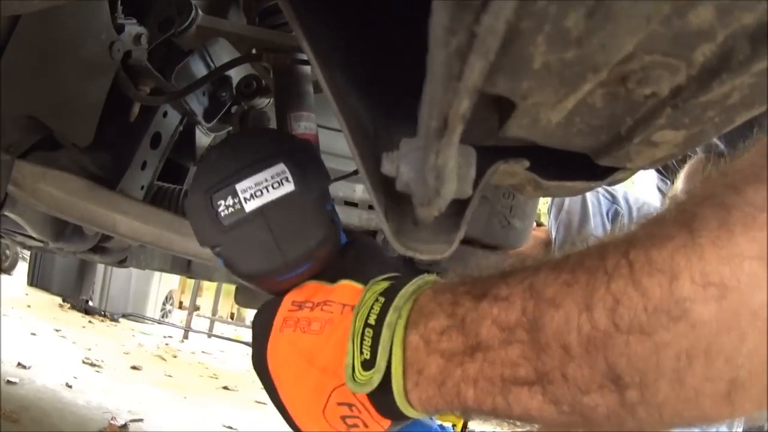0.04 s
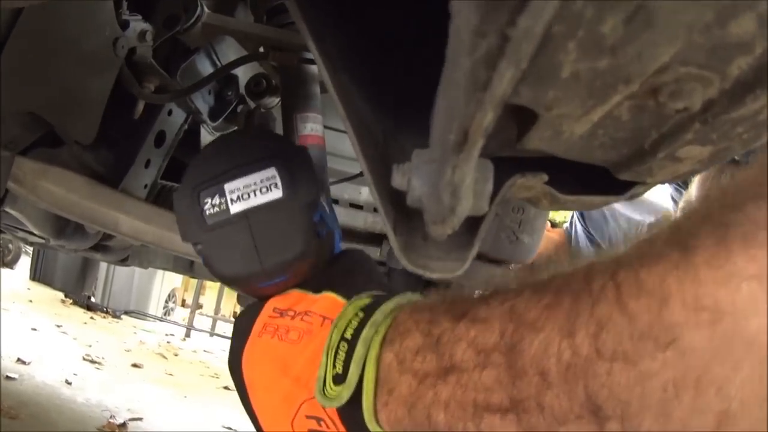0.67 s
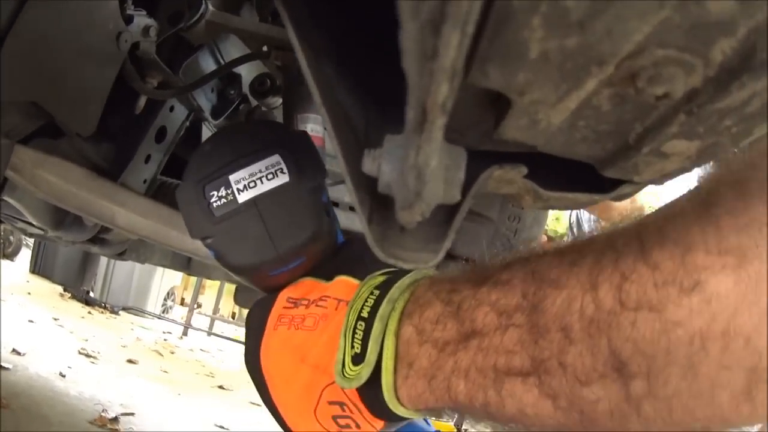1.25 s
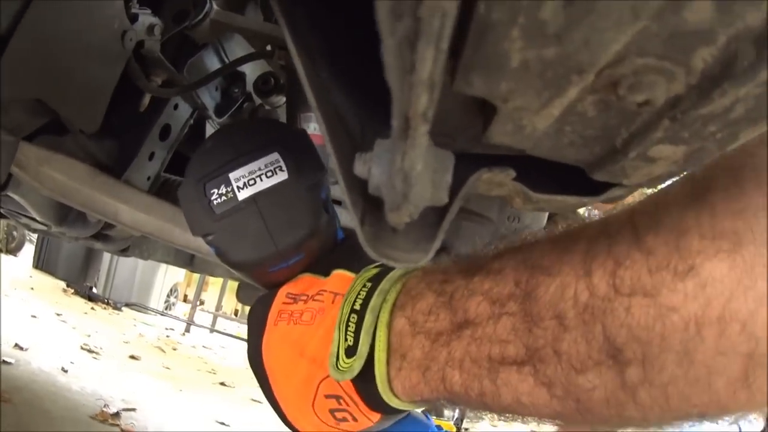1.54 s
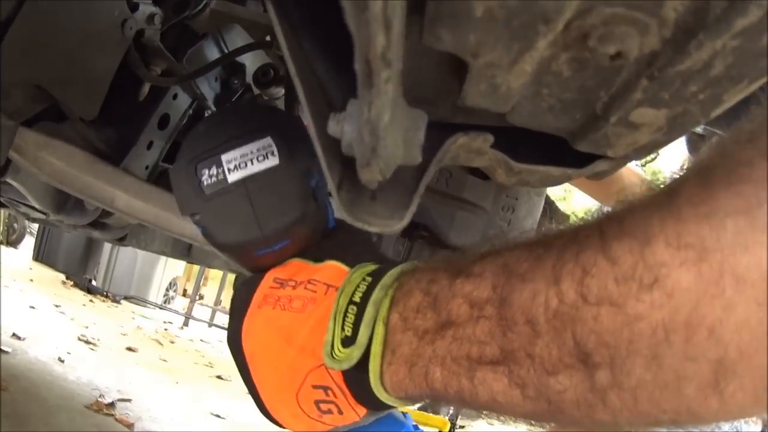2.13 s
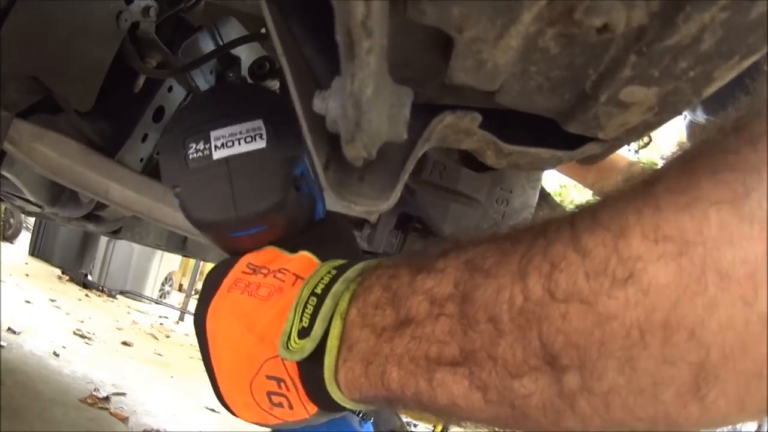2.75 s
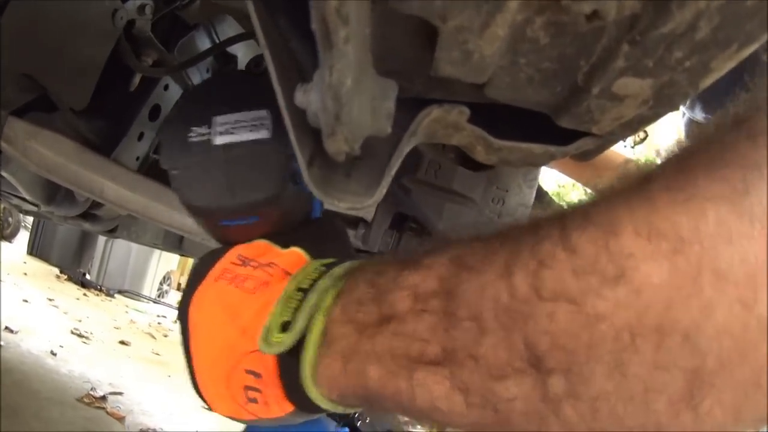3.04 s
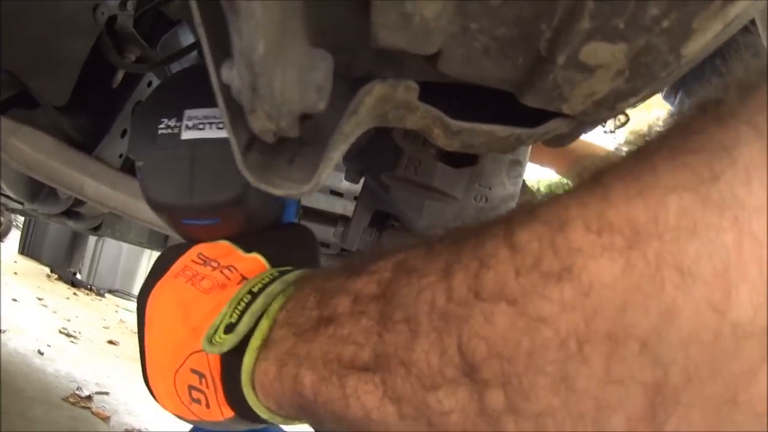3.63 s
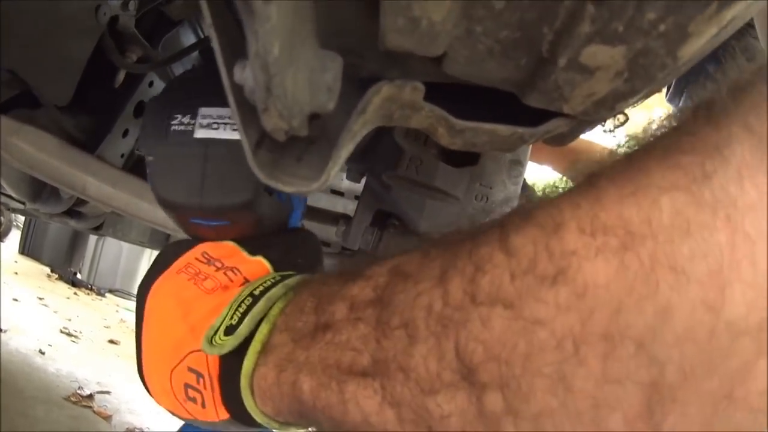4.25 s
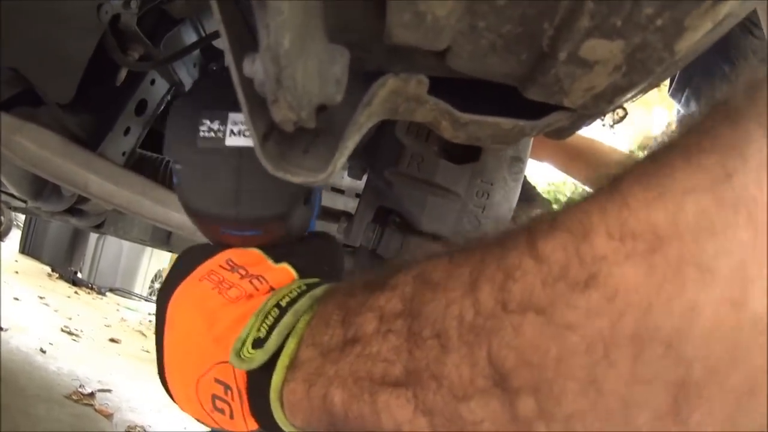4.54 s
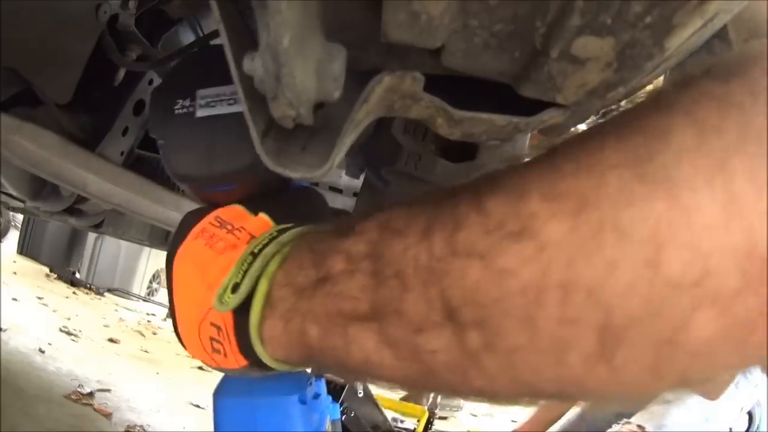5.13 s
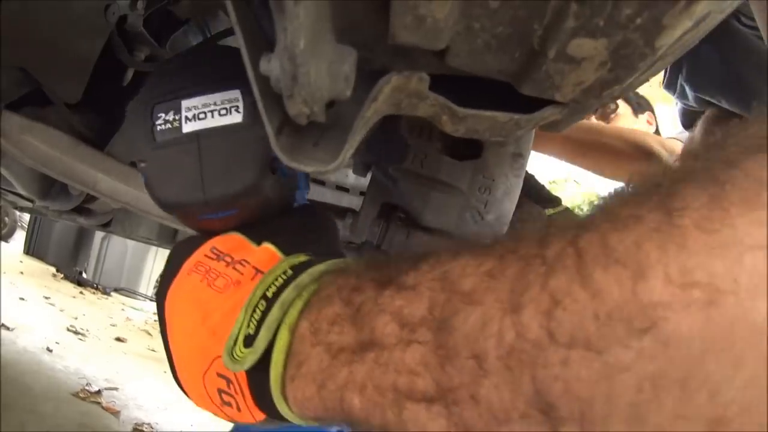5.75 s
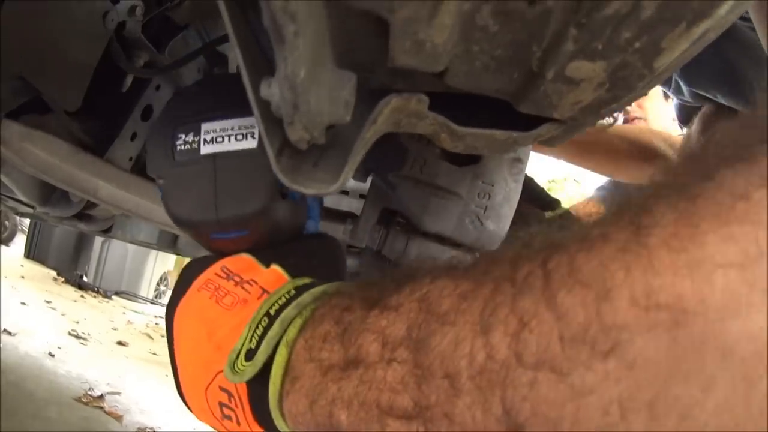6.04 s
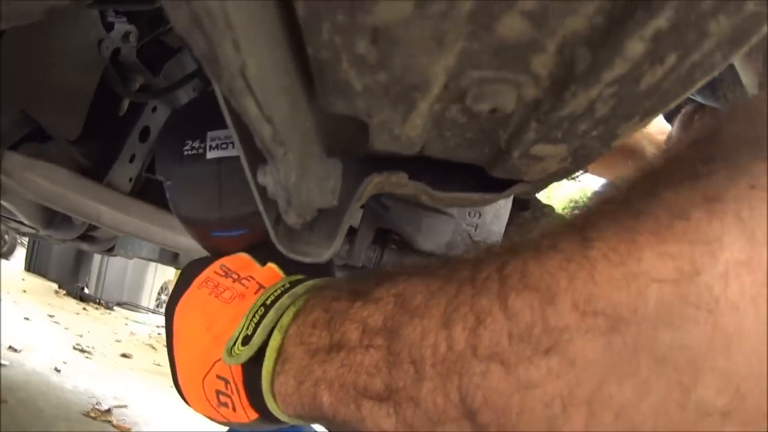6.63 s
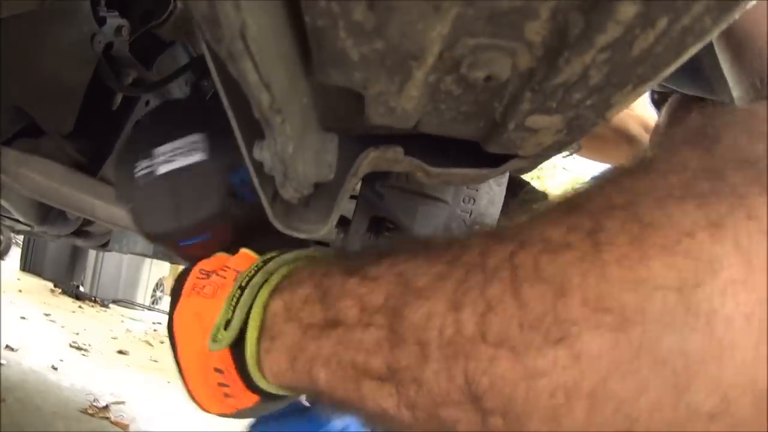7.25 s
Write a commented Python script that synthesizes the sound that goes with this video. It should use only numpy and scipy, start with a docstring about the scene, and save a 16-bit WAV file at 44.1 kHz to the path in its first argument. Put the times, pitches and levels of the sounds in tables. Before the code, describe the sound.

Close by, an impact wrench rattles hard on steel twice, then spins free and coasts down with a brief squeal and socket clinks.

```python
"""A cordless impact wrench works on a suspension bolt under a car. A glove rustles, stray blows land,
then the hammer runs at about forty blows a second, each cracking in the socket and ringing the arm.
It stalls, the socket rattles, and a second, longer burst follows. The bolt gives: the loose socket
clinks, the tool spins free, then coasts down with a falling gear whine, ticking teeth and one short
squeal. Last, the socket clinks again as the tool is shifted."""
import sys
import numpy as np
from scipy import signal
from scipy.fft import rfft, irfft
from scipy.io import wavfile
from scipy.ndimage import map_coordinates

SR = 44100
rng = np.random.default_rng(int(sys.argv[2]) if len(sys.argv) > 2 else 0)


def master_out(mix):
    """Clip the mix to full scale and print it as 16-bit PCM to the path in sys.argv[1]."""
    frames = np.transpose(np.atleast_2d(mix))
    ceiling = np.clip(frames, -1, 1)
    pcm = np.round(ceiling * 32767).astype(np.int16)
    wavfile.write(sys.argv[1], SR, pcm)


N = 329952
TIME = np.arange(N) / SR


def from_db(db):
    """Decibels to gain."""
    return 10 ** (np.asarray(db) / 20)


def unit_rms(x):
    """Scale to unit rms."""
    return x / np.sqrt(np.mean(x ** 2) + 1e-20)


def over_time(rows, outside=None):
    """Each column of a timed table, read at every sample."""
    times, *columns = np.transpose(rows)
    return [np.interp(TIME, times, column, outside, outside) for column in columns]


def at_hz(points, hz):
    """Read a table on a log-frequency axis."""
    knots_hz, values = np.transpose(points)
    return np.interp(np.log(np.maximum(hz, 1)), np.log(knots_hz), values)


def drift(per_s):
    """Smooth random wander of unit rms."""
    knots = rng.standard_normal(8192)
    return unit_rms(map_coordinates(knots, [TIME * per_s], order=3, mode="wrap"))


def coloured(spectrum):
    """Noise of unit rms with the given spectrum."""
    gain = from_db(at_hz(spectrum, np.fft.rfftfreq(N, 1 / SR)))
    return unit_rms(irfft(rfft(rng.standard_normal(N)) * gain, N))


def clicks(times, sizes):
    """One sample for each contact."""
    return np.bincount(np.clip(np.round(times * SR).astype(int), 0, N - 1), sizes, N)


def decay(energy, t60_s):
    """Stored energy leaks away by 60 dB in t60_s."""
    return signal.lfilter([1], [1, -from_db(-120 / (t60_s * SR))], energy + 1e-20)


# Handling spectra. Each row: frequency in Hz, density in dB.
RUMBLE = [(25, -53), (60, -8), (95, -16), (135, 1.5), (180, -1), (230, 5), (400, -2), (700, 0), (1200, -5),
          (2200, -17.5), (4400, -49)]
RUSTLE = [(410, -20.5), (700, -10), (788, -14), (1280, -17), (2840, -17), (6070, -29), (7010, -27),
          (10800, -45.5), (16000, -44)]
# Noise floor. Each row: time in seconds, rumble in dB, rustle in dB.
FLOOR = [(0, -59, -43.5), (1.6, -57.5, -63), (4.5, -43, -61), (5.6, -53.5, -63), (7.48, -48, -47.5)]
# Moves. Each row: middle in seconds, half length in seconds, rumble in dB, rustle in dB.
SHIFTS = [(.07, 0.086, -44, -34.5), (1.097, 0.16, -42.5, -48.5), (5.03, 0.17, -38, -55),
          (5.235, 0.081, -65, -58), (6.163, 0.12, -44, -53), (6.41, 0.11, -42.5, -67),
          (6.602, 0.077, -51, -39.5), (7.357, 0.08, -41.5, -48)]


def handling():
    """Glove and tool shift against the car, each move swelling and fading over the noise floor."""
    power = from_db(over_time(FLOOR)) ** 2
    for middle_s, half_s, *levels_db in SHIFTS:
        power += np.outer(from_db(levels_db) ** 2, np.exp(-2 * ((TIME - middle_s) / half_s) ** 2))
    rumble = np.sqrt(power[0]) * from_db(0.49 * drift(25)) * coloured(RUMBLE)
    rustle = np.sqrt(power[1]) * from_db(1.6 * drift(70)) * coloured(RUSTLE)
    return rumble + rustle


# Background tones. Each row: frequency in Hz, relative level in dB.
HUM = [(119, -64.5), (221, -56.5), (2891, -70.5), (3639, -68)]


def garage_hum():
    """Faint tones from around the garage waver in level and phase."""
    return sum(from_db(db + 1.5 + 0.52 * drift(11)) * np.sin(2 * np.pi * hz * TIME + drift(16))
               for hz, db in HUM)


# Decay of the dense steel modes. Each row: frequency in Hz, unscaled t60 in seconds.
RING_T60 = [(100, 0.28), (800, 0.28), (2000, 0.24), (5000, 0.12), (14000, 0.026)]
# First snap of a contact. Each row: frequency in Hz, relative level in dB.
SNAP = [(1000, -12.5), (2500, 1), (6000, -1.5), (11000, -30)]
BAND_EDGES_HZ = np.geomspace(25, 17000, 25)


def dense_ring(times, band_db, ring_scale, snap_db, snap_t60_s):
    """Countless steel modes, struck anew by each contact: a snap, then a ring dying band by band."""
    out, white = np.zeros(N), rng.standard_normal((2, N))
    for k, hz in enumerate(np.sqrt(BAND_EDGES_HZ[1:] * BAND_EDGES_HZ[:-1])):
        band = signal.butter(2, BAND_EDGES_HZ[k:k + 2], "band", fs=SR, output="sos")
        scatter_db = 1.2 * rng.standard_normal(len(times))  # no two contacts hit the same spot
        energy = clicks(times, from_db(band_db(hz) + scatter_db) ** 2)
        ring = decay(energy, ring_scale * at_hz(RING_T60, hz))
        snap = from_db(snap_db + at_hz(SNAP, hz)) ** 2 * decay(energy, snap_t60_s)
        out += signal.sosfilt(band, white[k % 2] * np.sqrt(ring + snap))
    return out


# Modes of arm and bolt. Each row: frequency in Hz, relative level in dB, t60 in seconds.
ARM_MODES = [(219.7, -8.5, 0.079), (322.2, -5.5, 0.13), (372.4, -5, 0.053), (433, -9.5, 0.25),
             (567.2, -3, 0.14), (676.6, -4.5, 0.13), (785, -4, 0.2), (839, 0, 0.057), (920, 0.5, 0.18),
             (1000, 2, 0.12), (1222, 0.5, 0.11), (1364, 3, 0.055), (1417, 1, 0.11), (1653, 2.5, 0.041),
             (1780, 8, 0.055), (2523, 4.5, 0.075), (2754, 6, 0.062), (3000, -1, 0.028), (3180, -9.5, 0.062),
             (3310, 5.5, 0.047), (3534, -1.5, 0.073), (3653, 3.5, 0.03), (4370, -12, 0.045)]


def arm_ring(times, level_db, scatter_db):
    """Each contact strikes every mode of the suspension arm with a strength of its own."""
    out = np.zeros(N)
    for k, (hz, db, t60_s) in enumerate(ARM_MODES):
        radius, angle = from_db(-60 / (t60_s * SR)), 2 * np.pi * hz / SR
        feedback = [1, -2 * radius * np.cos(angle), radius * radius]
        push = clicks(times, from_db(level_db + db + scatter_db * rng.standard_normal(len(times))))
        out += (-1) ** k * signal.lfilter([.5, 0, -.5], feedback, push + 1e-18 * rng.random(N))
    return out


def knocks(rows, spectrum, level_db, arm_db, bounce_s, bounce_db, **ring):
    """Contacts that bounce once. Each row: start in seconds, then level, extra bass and treble in dB."""
    bounces = rows + [0, bounce_db, 0, 0]
    bounces[:, 0] += bounce_s * rng.uniform(.8, 1.2, len(rows))
    times, db, bass_db, treble_db = np.vstack([rows, bounces]).T

    def band_db(hz):
        low = at_hz([(700, 1), (1500, 0)], hz)
        high = at_hz([(4000, 0), (6000, 1)], hz)
        return level_db + at_hz(spectrum, hz) + db + low * bass_db + high * treble_db
    return dense_ring(times, band_db, **ring) + arm_ring(times, db + bass_db + arm_db, scatter_db=6)


# Steel struck by the hammer. Each row: frequency in Hz, density in dB.
CRACK = [(100, -73), (300, -14), (600, -7), (930, -1), (1100, -5.5), (1750, 1), (2150, -1), (2700, -1.5),
         (3600, 1.5), (5500, -5), (7900, 0), (9800, -17), (12000, -12.5), (13600, -6.5), (16000, -19.5)]
# Blows out of step. Each row: start in seconds, level in dB, extra treble in dB.
STRAY_BLOWS = [(0.0323, -11, -4.5), (0.0735, -5, -25), (0.0862, -20, 7), (0.0997, -7, 1), (0.1164, -10, -6),
               (0.132, -13, -4), (0.145, -5.5, -3.5), (0.9213, -7.5, -0.5), (0.946, -10.5, -5),
               (0.9594, -8, 0), (0.9873, -9, -16.5), (.997, -16.5, -2), (1.0198, -20, -1),
               (1.0287, -12, 3.5), (1.744, -10.5, -0.5), (1.7873, -7, -12), (1.818, -8.5, 0.5),
               (1.8304, -8.5, -2), (1.8456, -8, -10), (1.8626, -5.5, -3), (1.8885, -13.5, -4)]


def stray_blows(bass_db):
    """Starting or stalling, the hammer lands heavily; a glancing blow is duller and has less weight."""
    times, db, treble_db = np.transpose(STRAY_BLOWS)
    rows = np.column_stack([times, db, bass_db + 0.18 * treble_db, treble_db])
    return knocks(rows, CRACK, level_db=-3.5, arm_db=-29, bounce_s=0.0067, bounce_db=-7.5,
                  ring_scale=1, snap_db=12, snap_t60_s=0.0045)


def blow_times(burst, limp_s=.0003, jitter_s=.0001, settle_blows=2, sag_s_per_blow=1.25e-5):
    """The hammer finds its pace, then slows as the battery sags; its two lugs land early and late."""
    start_s, end_s, period_s, run_up_s = burst
    blow = np.arange((end_s - start_s) / period_s)
    lag_s = run_up_s * (1 - np.exp(-blow / settle_blows))
    times = start_s + period_s * blow + lag_s + sag_s_per_blow * blow ** 2 / 2
    uneven = times + limp_s * (blow % 2 - .5) + jitter_s * rng.standard_normal(len(blow))
    return uneven[times < end_s]


def socket_ring(times, level_db, t60_s, snap_db, snap_t60_s):
    """The part of the ring that is the same for every blow gives the hammering its hard buzz."""
    t = TIME[:SR // 8]
    attack = 1 - np.exp(-t / 0.000068)  # the crack spreads through socket and bolt
    fade = from_db(-60 * t / t60_s) + from_db(snap_db - 60 * t / snap_t60_s)
    response = coloured(CRACK)[:len(t)] * attack * fade
    return signal.fftconvolve(clicks(times, from_db(level_db)), response)[:N]


# Hammer rebounding along its cam. Each row: frequency in Hz, density in dB.
REBOUND = [(40, -29), (110, -42), (220, -7), (450, -6), (750, 1), (1100, -7.5), (1700, -1), (3000, 3),
           (6000, -4.5), (15000, -40.5)]
# Steady hammering. Each row: start, end, base blow period, time lost in run-up, all in seconds.
BURSTS = [(.1795, .9, .02464, .0181), (1.8981, 4.45, .02442, .0153)]
CRACK_DB, CRACK_FADE_DB_PER_S, CRACK_SCATTER_DB = -20, 0.13, 1.7
THUD_DB, THUD_FADE_DB_PER_S, UNSETTLED_DB, UNSETTLED_S = -22, 0.96, 5, 0.065


def hammering():
    """Lugs crack on the anvil; between blows the hammer rebounds and its reaction shakes the arm."""
    bursts = [blow_times(burst) for burst in BURSTS]
    times = np.concatenate(bursts)
    age_s = np.concatenate([blows - blows[0] for blows in bursts])
    crack_db = CRACK_DB - CRACK_FADE_DB_PER_S * age_s + CRACK_SCATTER_DB * rng.standard_normal(len(times))
    thud_db = THUD_DB - THUD_FADE_DB_PER_S * age_s + UNSETTLED_DB * np.exp(-age_s / UNSETTLED_S)
    out = dense_ring(times, lambda hz: crack_db + at_hz(CRACK, hz) + 7.5,
                     ring_scale=0.76, snap_db=12, snap_t60_s=0.011)
    out += socket_ring(times, crack_db - .3, t60_s=0.094, snap_db=-3.5, snap_t60_s=0.013)
    for delay_s, gain_db in [(.0062, 0.29), (.0155, 0)]:
        rebounds = times + delay_s + 0.00041 * rng.standard_normal(len(times))
        out += dense_ring(rebounds, lambda hz: thud_db + gain_db + at_hz(REBOUND, hz),
                          ring_scale=1, snap_db=-9, snap_t60_s=0.027)
    return out + arm_ring(times + .005, thud_db - 10, scatter_db=4.5)


# Clink spectrum. Each row: frequency in Hz, density in dB.
CLINK_SPECTRUM = [(40, -25), (110, -19), (230, -0.5), (800, 2), (1300, -1.5), (1900, -0.5), (2700, -2),
                  (4000, -1.5), (5200, -20.5), (8000, 5), (9600, -54), (12000, -18), (15500, -36)]
# Clinks on the bolt, bassier bumps on the arm. Each row: start in seconds, level in dB, extra bass in dB.
CLINKS = [(1.192, -30, -16), (1.2087, -25, -22), (1.242, -29.5, -13), (1.727, -24, -15),
          (4.5355, -10.5, 4.5), (4.58, -18.5, 10), (4.597, -10, 0), (4.7334, -8, 1.5), (4.742, -8.5, -6),
          (4.792, -4.5, -3.5), (4.844, -17, 9), (4.8545, -7.5, -3), (4.8666, -13.5, 6), (5.018, -5.5, -6.5),
          (5.1268, -18, -1), (6.071, -32, 18), (6.337, -24, 7), (6.394, -44, 17), (6.5965, -23, 11.5),
          (6.6091, -16.5, 0.5), (6.631, -14, -4), (6.651, -16, -26), (6.687, -24, -4), (7.0097, -21.5, -29),
          (7.1872, -39.5, 12.5), (7.2616, -18.5, -2.5), (7.2737, -26, -4), (7.3576, -26, -10),
          (7.3984, -8.5, -10)]
FULL_CLINK_DB, TREBLE_DB_PER_DB = -11.5, 0.51
# Light rattling. Each row: start in seconds, end in seconds, level in dB.
RATTLES = [(1.108, 1.29, -37), (1.327, 1.457, -47), (7.267, 7.352, -35.5)]
RATTLE_PER_S, RATTLE_SCATTER_DB, RATTLE_BASS_DB, RATTLE_TREBLE_DB = 36, 4.5, -13, 3.5


def loose_socket():
    """The socket clinks, brighter the harder it hits, and rattles as the tool is eased or moved."""
    rows = [(start_s, db, bass_db, TREBLE_DB_PER_DB * (db - FULL_CLINK_DB))
            for start_s, db, bass_db in CLINKS]
    for start_s, end_s, db in RATTLES:
        for slot_s in np.arange(start_s, end_s, 1 / RATTLE_PER_S):
            hit_s = slot_s + rng.random() / RATTLE_PER_S
            hit_db = db + RATTLE_SCATTER_DB * rng.standard_normal()
            rows.append((hit_s, hit_db, RATTLE_BASS_DB, RATTLE_TREBLE_DB))
    return knocks(np.array(rows), CLINK_SPECTRUM, level_db=-4.5, arm_db=-27, bounce_s=0.0061,
                  bounce_db=-12, ring_scale=0.49, snap_db=10.5, snap_t60_s=0.019)


FREE_AT_S, RELEASE_AT_S, TOP_HZ, DRAG_S, FRICTION_HZ_PER_S = 4.46, 4.86, 1308, 1.07, 273
GEAR_DB, DRIVEN_DB, DRIVEN_FADE_S, GEAR_SPEED_POWER = -29, 3, 0.13, 0.98


def rotor():
    """Rotor speed and gear noise level: free spin, then trigger off, coasting on drag and dry friction."""
    coast_s = np.maximum(TIME - RELEASE_AT_S, 0)
    friction_hz = FRICTION_HZ_PER_S * DRAG_S
    rotor_hz = np.maximum((TOP_HZ + friction_hz) * np.exp(-coast_s / DRAG_S) - friction_hz, 1)
    driven_db = DRIVEN_DB * np.exp(-coast_s / DRIVEN_FADE_S)
    gear_db = GEAR_DB + driven_db + GEAR_SPEED_POWER * 20 * np.log10(rotor_hz / TOP_HZ)
    return rotor_hz, np.where(TIME > FREE_AT_S, gear_db, -120)


def standing_waves(x, echo_db, t60_s):
    """Echoes off the underbody interfere, so a gliding tone swells and breaks up."""
    t = TIME[:SR // 10]
    echoes = unit_rms(rng.standard_normal(len(t)) * from_db(-60 * t / t60_s)) / np.sqrt(len(t))
    return (x + from_db(echo_db) * signal.fftconvolve(x, echoes)[:N]) / np.hypot(1, from_db(echo_db))


# Whine levels. Each row: time in seconds, then third order, fourth order and weak orders in dB.
WHINE_LEVELS = [(4.5, -78, -43, -70), (4.93, -54, -41, -61), (5.1, -44, -30.5, -36.5),
                (5.46, -40, -28.5, -38), (5.55, -42, -35.5, -41), (5.64, -30.5, -42, -40),
                (5.76, -46, -48, -44.5), (6.1, -45, -71, -40), (6.16, -70, -66, -59)]
# Weak orders. Each row: multiple of rotor speed, relative level in dB.
WEAK_ORDERS = [(1, -13), (5, -5.5), (6, -10.5), (7, -8.5), (8, -8)]
# Radiation of the weak orders by the housing. Each row: frequency in Hz, gain in dB.
HOUSING = [(300, -38), (500, -2), (680, 10.5), (1000, -13.5), (1500, -0.5), (2500, 8), (4000, 5.5),
           (5000, -14), (7000, -12.5)]
# Gear and bearing noise. Each row: frequency in Hz, density in dB.
GEAR_SPECTRUM = [(290, -70), (500, -13.5), (718, 2.5), (919, -3), (1090, -3), (1210, -3), (1340, 1.5),
                 (2360, 4.5), (3290, -2), (5310, -11.5), (5550, -10), (7980, -7), (9630, -27.5),
                 (13300, -26.5), (16000, -32)]


def free_spin():
    """Gear teeth whine at multiples of rotor speed, over a rattle that throbs with the output shaft."""
    rotor_hz, gear_db = rotor()
    turns = np.cumsum(rotor_hz * (1 + .0018 * drift(90))) / SR
    third_db, fourth_db, weak_db = over_time(WHINE_LEVELS, outside=-120)
    partials = [(3, third_db), (4, fourth_db)]
    partials += [(order, weak_db + db + at_hz(HOUSING, order * rotor_hz)) for order, db in WEAK_ORDERS]
    whine = sum(from_db(db + 1.8 * drift(60)) * np.sin(2 * np.pi * order * turns)
                for order, db in partials)
    throb_db = np.sin(2 * np.pi * turns / 12) + 1.55 * drift(220)  # 12:1 reduction
    whine = np.sqrt(2) * standing_waves(whine, echo_db=-7, t60_s=0.16)
    return whine + from_db(gear_db + throb_db) * coloured(GEAR_SPECTRUM)


# A tooth ticking in its play. Each row: frequency in Hz, density in dB.
TOOTH_TICK = [(600, -32), (1500, -9), (2200, 12), (2700, 12), (3400, -36), (8000, -36), (12000, -53)]


def backlash(per_s, level_db, t60_s):
    """As the gears slow and slacken, their teeth tick against each other at random."""
    rotor_hz, gear_db = rotor()
    slack = 1 - rotor_hz / rotor_hz.max()
    hits = rng.random(N) < per_s / SR
    ticks = hits * from_db(gear_db + level_db + 2.1 * rng.standard_normal(N)) * slack ** 2
    gear_case = signal.butter(2, 6000, fs=SR, output="sos")
    return signal.sosfilt(gear_case, np.sqrt(decay(ticks ** 2, t60_s)) * coloured(TOOTH_TICK))


# Squealing socket modes. Each row: frequency in Hz, relative level in dB.
SQUEAL_MODES = [(5534, -2), (14492, -29)]


def squeal(start_s, hold_s, level_db, lead_s=0.049, lead_db=-20, rise_db_per_s=4000, fall_db_per_s=212):
    """Steel rubbing on steel: a faint lead-in, then it locks onto two socket modes, holds and dies."""
    t = TIME - start_s
    lead_in_db = lead_db + rise_db_per_s * np.minimum(t + lead_s, 0)
    onset_db = np.maximum(lead_in_db, rise_db_per_s * np.minimum(t, 0))
    envelope = from_db(level_db + onset_db - fall_db_per_s * np.maximum(t - hold_s, 0))
    wavering_s = TIME + np.cumsum(0.00021 * drift(96)) / SR
    return envelope * sum(from_db(db) * np.sin(2 * np.pi * hz * wavering_s) for hz, db in SQUEAL_MODES)


def underbody(x, side_db, near_t60_s, far_db, far_t60_s, dull_hz):
    """Quick reflections between floor and car arrive from the sides; the garage adds a dull tail."""
    t = TIME[:SR // 2]
    near = unit_rms(rng.standard_normal(len(t)) * from_db(-60 * t / near_t60_s))
    far = signal.sosfilt(signal.butter(1, dull_hz, fs=SR, output="sos"), rng.standard_normal((2, len(t))))
    far = unit_rms(far * from_db(-60 * t / far_t60_s))
    echoes = from_db(side_db) * np.array([near, -near]) + from_db(far_db) * far
    return x + signal.fftconvolve(x[None], echoes / np.sqrt(len(t)), axes=1)[:, :N]


def scene():
    """The wrench at arm's length under the car."""
    low_cut = signal.butter(2, 85, "high", fs=SR, output="sos")  # the steel sounds carry little below 85 Hz
    steel = signal.sosfilt(low_cut, hammering() + stray_blows(bass_db=6.5) + loose_socket())
    gears = free_spin() + backlash(per_s=100, level_db=12.5, t60_s=0.023)
    direct = steel + gears + handling() + garage_hum()
    stereo = underbody(direct, side_db=-13.5, near_t60_s=.035, far_db=-23.5, far_t60_s=0.54, dull_hz=1570)
    return stereo + squeal(start_s=5.31, hold_s=0.1, level_db=-16.5)


# Port balance. Each row: frequency in Hz, left minus right in dB.
PORT_BALANCE = [(100, -.8), (180, -2.3), (350, -3.9), (700, -3.5), (1400, -1.9), (2800, .4), (5500, 1.2),
                (13000, .3)]
# Port phase. Each row: frequency in Hz, lead of the left in radians.
PORT_PHASE = [(60, 0), (260, -.45), (520, -.58), (1000, -.4), (1800, -.25), (4000, -.15), (6500, -.1),
              (8300, .3), (11000, 0)]
CEILING, CUTOFF_HZ = 0.61, 16000


def record(dry):
    """Two close microphone ports differ a little in level and phase; peaks are rounded, the top is cut."""
    hz = np.fft.rfftfreq(N, 1 / SR)
    left_gain = from_db(at_hz(PORT_BALANCE, hz) / 2) * np.exp(.5j * at_hz(PORT_PHASE, hz))
    ports = irfft(rfft(dry) * np.array([left_gain, 1 / left_gain]), N)
    rounded = CEILING * np.tanh(ports / CEILING)
    return signal.sosfilt(signal.ellip(10, .1, 80, CUTOFF_HZ, fs=SR, output="sos"), rounded)


dry = scene()
out = record(dry)
master_out(out)
```